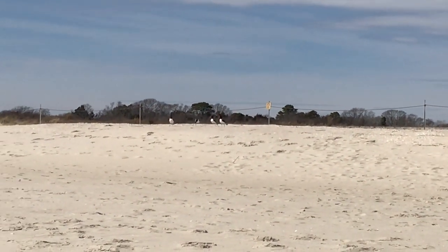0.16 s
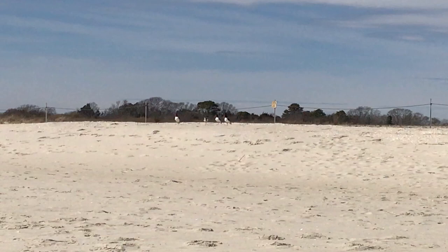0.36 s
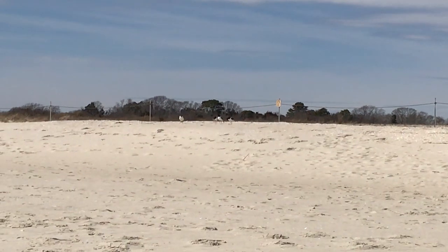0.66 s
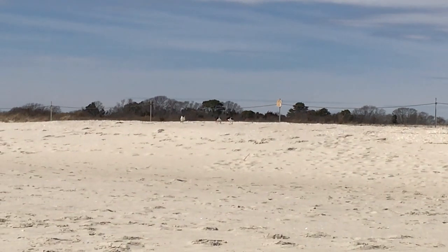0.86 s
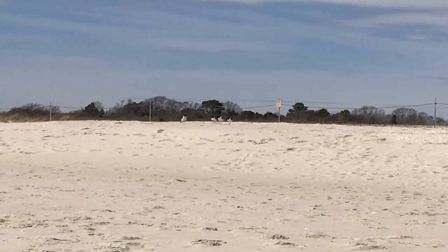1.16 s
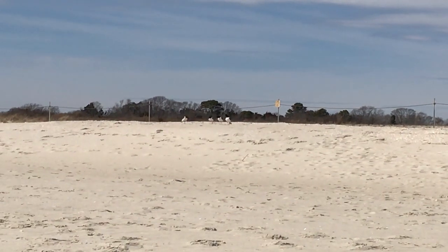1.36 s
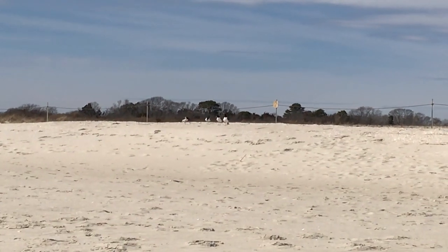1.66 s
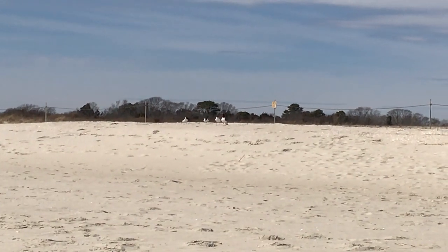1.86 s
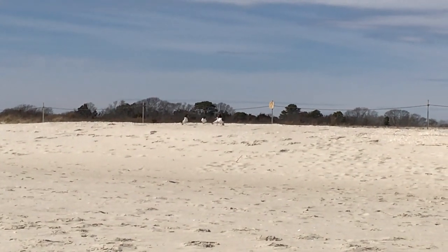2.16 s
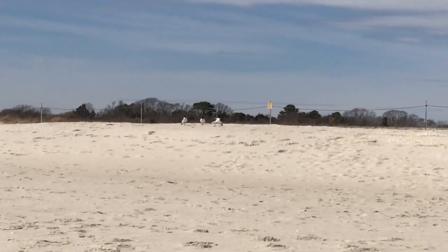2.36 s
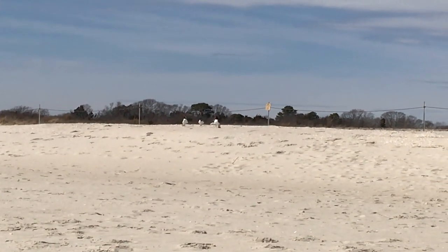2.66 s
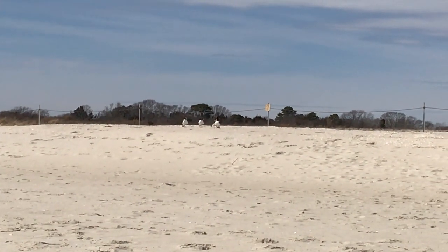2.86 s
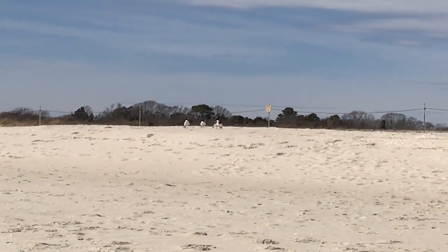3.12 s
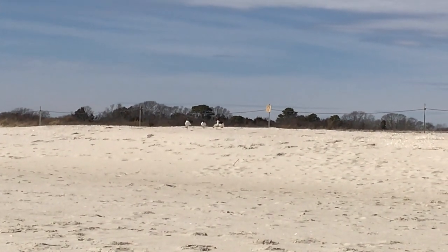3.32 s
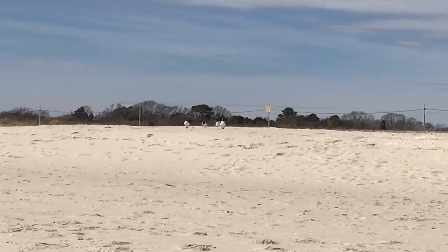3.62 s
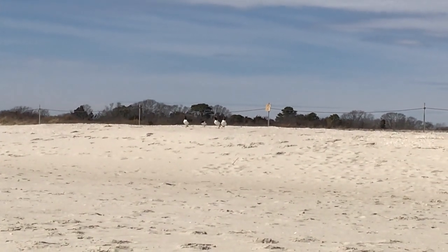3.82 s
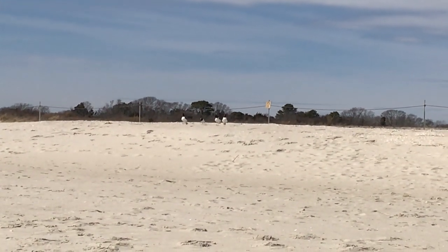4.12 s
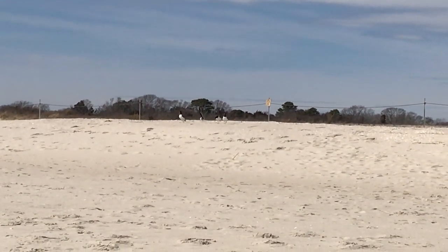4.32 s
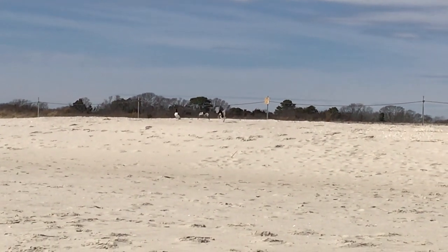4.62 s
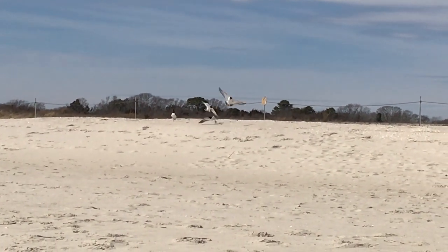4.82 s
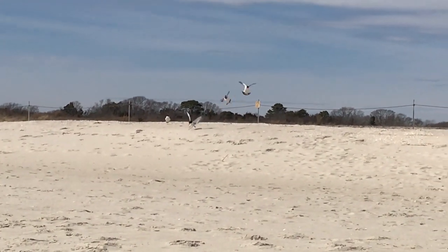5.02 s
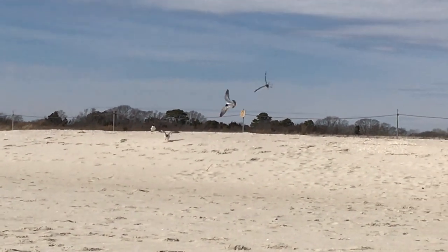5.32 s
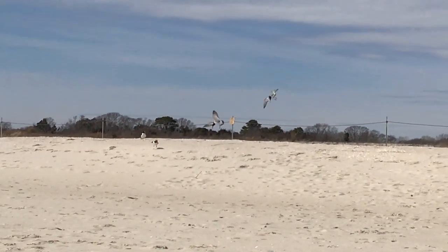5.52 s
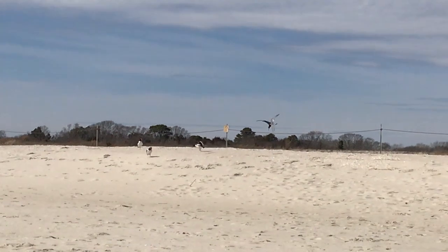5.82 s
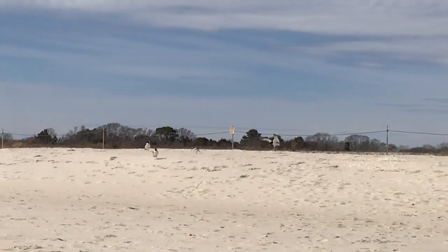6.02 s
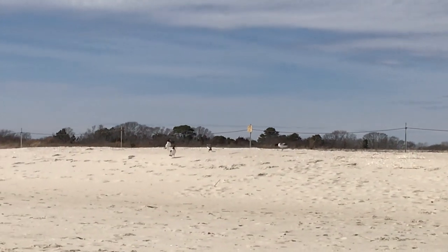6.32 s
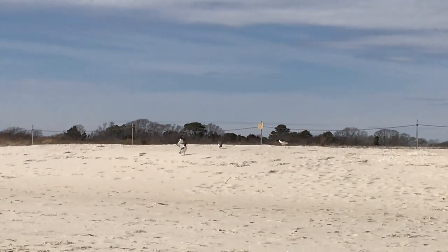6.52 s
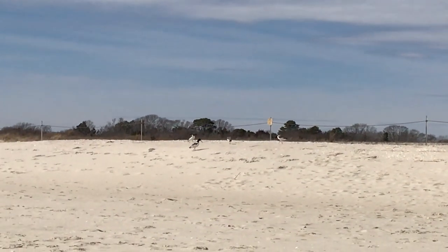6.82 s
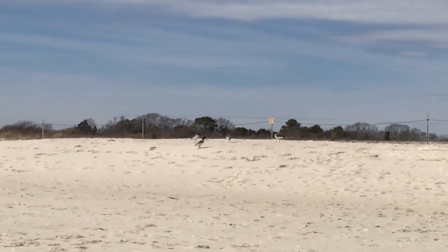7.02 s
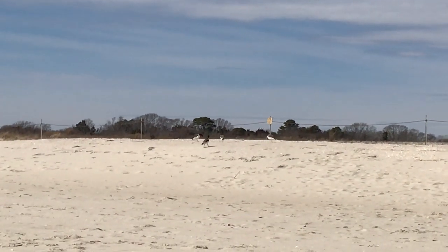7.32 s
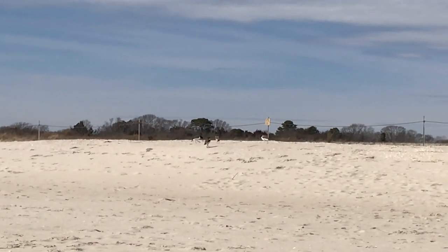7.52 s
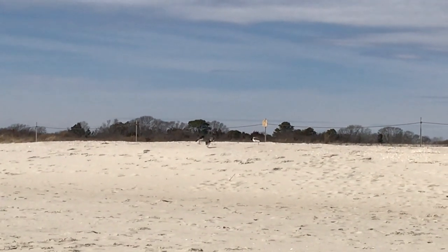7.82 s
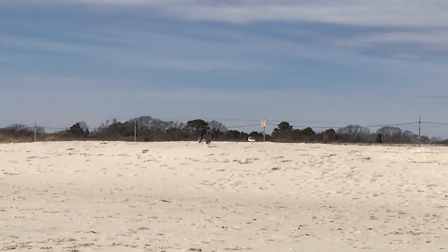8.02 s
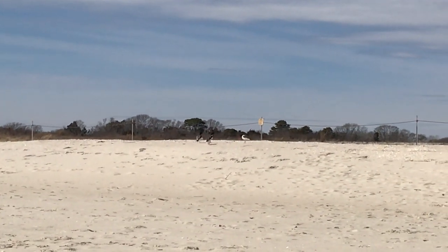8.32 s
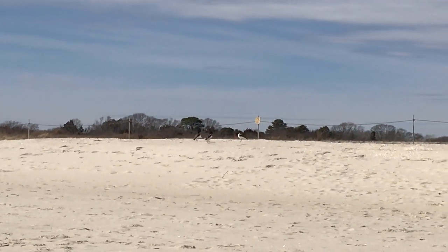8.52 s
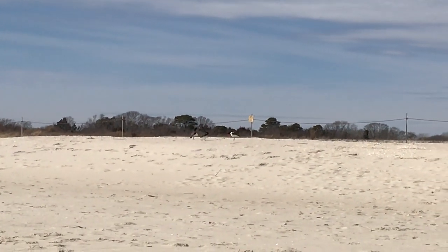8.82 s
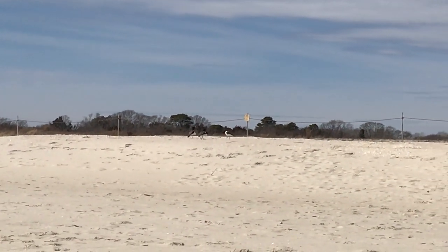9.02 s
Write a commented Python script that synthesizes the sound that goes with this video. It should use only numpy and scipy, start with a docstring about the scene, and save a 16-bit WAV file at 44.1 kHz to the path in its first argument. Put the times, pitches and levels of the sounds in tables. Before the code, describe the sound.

Open beach, mono, dry, about nine seconds. From the start several shorebirds pipe rapid chains of short high whistles, around 2.2 to 2.6 kHz, each arching up and falling, roughly ten a second per bird and overlapping. They grow louder from 0.7 to 2.3 s, then thin out; from 2.7 to 4.8 s there are mostly separate longer whistles. Meanwhile a wave's soft roar swells from 1 s, gains spray hiss, peaks near 4.5 to 4.9 s and drains abruptly by 5.5 s. At 5 s the piping bursts out again, loud and dense until about 6.5 s, then recedes, fainter and duller, with a faint farther flock. Low wind buffets thump the microphone irregularly, strongest near 0.6, 2.8 and 4.9 s, with later knocks near 7.5, 8.4 and 9 s. A faint low wavering hum becomes slightly clearer after the wave.

```python
"""An open sandy beach: several shorebirds pipe fast strings of short arched whistles and some long drawn ones.
The birds are harmonic tones under a pitch arch; a wave of filtered noise swells, hisses and drains away.
A faint hum of slowly frequency-modulated sines lies below, and gusts buffet the microphone as octave bands
of noise whose spectrum shifts towards the smaller eddies as the wind force grows."""
import sys
import numpy as np
from scipy import signal
from scipy.io import wavfile

SR = 44100
rng = np.random.default_rng(int(sys.argv[2]) if len(sys.argv) > 2 else 0)


def log_audio(samples):
    """Write samples as a 16-bit WAV file to the path given in sys.argv[1]."""
    # one column per channel
    frames = np.atleast_2d(samples).T
    # limit to full scale, then quantise
    limited = np.clip(frames, -1, 1)
    pcm = np.round(limited * 32767).astype(np.int16)
    wavfile.write(sys.argv[1], SR, pcm)


N = 404397   # length [samples]


def from_db(db):
    """Level law: amplitude gain is ten to the power of dB over 20."""
    return 10 ** (np.asarray(db) / 20)


def rms_one(x):
    """Normalization: the signal is scaled to unit root mean square."""
    return x / np.sqrt(np.mean(x ** 2) + 1e-20)


def in_time(rows):
    """Linear interpolation: each column of a time table becomes one value a sample."""
    times, *columns = np.transpose(rows)
    return [np.interp(np.arange(N) / SR, times, column) for column in columns]


def drift(rate_hz):
    """Low-passed chance: white noise through two equal one-pole filters, zero mean and unit spread."""
    step, run_in = 20, 4000   # drawn at every 20th sample; the filter's start is dropped
    pole = np.exp(-2 * np.pi * rate_hz * step / SR)
    noise = rng.standard_normal(N // step + run_in + 2)
    slow = signal.lfilter([1], [1, -2 * pole, pole * pole], noise)[run_in:]
    return np.interp(np.arange(N) / step, np.arange(len(slow)), rms_one(slow - slow.mean()))


def band(x, low_hz, high_hz):
    """Band-pass filtering: Butterworth response between two corner frequencies."""
    return signal.sosfilt(signal.butter(2, [low_hz, high_hz], "band", fs=SR, output="sos"), x)


def wash(spectrum, patchy_db):
    """Turbulent noise as a sum of half-octave bands, each with its own level and flicker; unit rms."""
    out = 0
    edges = 110 * 2 ** np.arange(0, 7.6, .5)
    white = rng.standard_normal((2, N))   # neighbouring bands use different noise
    hz, db = np.transpose(spectrum)
    for k, (low, high) in enumerate(zip(edges, edges[1:])):
        log_centre = np.log(low * high) / 2
        level_db = np.interp(log_centre, np.log(hz), db, left=-60, right=-60)
        flicker_db = patchy_db * drift(12.5)
        out = out + from_db(level_db + flicker_db) * band(white[k % 2], low, high)
    return rms_one(out)


# the wave's course, before the fixed gains in surf():
# (time [s], roar level [dB], spray level [dB])
SURF = [(0, -59, -77), (.6, -55.5, -77.5), (1.15, -48.5, -67.5), (2.3, -43, -66), (3.1, -45, -62),
        (4.5, -40, -56), (4.88, -40.5, -53.5), (5.1, -48.5, -59.5), (5.5, -58.5, -69.5), (7.2, -55, -81)]
# relative spectrum of the roar: (frequency [Hz], density [dB per Hz])
ROAR = [(150, -4), (330, -4.5), (600, -6), (950, -4.5), (2300, -13.5), (3000, -19.5), (6500, -41)]
# relative spectrum of the spray: (frequency [Hz], density [dB per Hz])
SPRAY = [(3500, 5.5), (10000, -9), (16000, -25)]


def surf():
    """Broadband radiation of a wave: a low roar and a high spray hiss under separate level curves."""
    roar_db, spray_db = in_time(SURF)
    roar = from_db(roar_db + 3.0) * wash(ROAR, patchy_db=1.02)
    spray = from_db(spray_db + 5.0) * wash(SPRAY, patchy_db=2.0)
    return roar + spray


# partials of the hum at its full strength: (mean frequency [Hz], peak level [dB])
HUM = [(76, -44), (155, -56.5), (232, -57.5), (460, -64)]


def hum():
    """Frequency modulation: faint low sines waver in pitch and come up as the wave drains."""
    t = np.arange(N) / SR
    tones = 0
    for hz, db in HUM:
        time_shift = 0.01603 * np.cumsum(drift(2.35)) / SR   # pitch spread 1.6 %
        tones = tones + from_db(db) * np.sin(2 * np.pi * hz * (t + time_shift))
    return tones * from_db(np.interp(t, [4.5, 5.4], [-12, 0]))


# steady wind between the buffets, before its random swing: (time [s], force level [dB])
BREEZE = [(0, -49), (1.3, -41.5), (1.85, -57), (2.15, -37), (3.5, -41.5), (5.3, -38.5), (6, -44.5),
          (9.17, -43.5)]
# buffets on the microphone: (centre time [s], standard deviation [s], peak force level [dB])
GUSTS = [(0.223, 0.045, -38), (0.569, 0.0031, -19.5), (0.59, 0.032, -29), (1.23, 0.0073, -26),
         (2.17, 0.037, -52), (2.315, 0.14, -40.5), (2.754, 0.0037, -12.5), (2.794, 0.041, -23),
         (3.032, 0.039, -30), (3.635, 0.012, -28), (4.122, 0.0049, -26.5), (4.265, 0.046, -32),
         (4.512, 0.0078, -23), (4.86, 0.01, -27), (4.943, 0.017, -13.5), (5.039, 0.0034, -28.5),
         (5.193, 0.047, -36), (5.379, 0.017, -25.5), (5.507, 0.029, -27.5), (6.501, 0.014, -26),
         (7.211, 0.014, -32.5), (7.466, 0.0087, -22), (8.416, 0.01, -19), (8.964, 0.015, -33.5),
         (9.036, 0.016, -24.5)]
# eddy sizes in a strong gust, one entry an octave from 36 Hz up: (level [dB])
EDDY_DB = [-2.5, -3.2, -8.5, -18.5, -43]


def wind():
    """Turbulent pressure at the microphone: the harder the gust, the more small sharp eddies ride on it."""
    t = np.arange(N) / SR
    force = from_db(in_time(BREEZE)[0] + 3.87 * drift(2.74))
    reach_s = .25   # each bell-shaped gust is cut off this far from its centre
    for s, width_s, db in GUSTS:
        near = slice(max(round((s - reach_s) * SR), 0), round((s + reach_s) * SR))
        force[near] += from_db(db) * np.exp(-.5 * ((t[near] - s) / width_s) ** 2)
    out, lumps = 0, drift(30.4)   # all octaves share the same lumps of pressure
    for octave, db in enumerate(EDDY_DB):
        low_hz = 36 * 2 ** octave
        noise = band(rng.standard_normal(N), low_hz, 2 * low_hz)
        eddy = rms_one(noise * from_db(4.74 * lumps))
        growth = (force / from_db(-20.5)) ** (0.2 * (octave - 1))   # 1 for every octave at -20.5 dB
        out = out + eddy * force * growth * from_db(db)
    return out


# harmonics 3-6 of a note, before its own brightness and colour: (level [dB])
OVERTONES_DB = [-5, -16.5, -24, -37]
DROOP_PER_S = 0.398   # share of its top pitch that a note loses per second past its crest, besides its fall


def whistle(length_s, crest, top_hz, rise, fall, bright_db, boost_db, shrill_db, chance, edge_s=0.0053):
    """Harmonic synthesis: integrated frequency gives the phase of a tone whose pitch arches up and down."""
    t = np.arange(round(length_s * SR)) / SR
    v = t / length_s
    flatness = 2.1 + 7 * length_s   # longer notes hold their top pitch
    climb = rise * np.abs(1 - v / crest) ** flatness
    descent = fall * np.abs((v - crest) / (1 - crest)) ** (flatness + 16 * length_s)
    droop = DROOP_PER_S * (t - crest * length_s)
    sag = np.where(v < crest, climb, descent + droop)   # share below the top pitch
    phase = 2 * np.pi * np.cumsum(top_hz * (1 - sag)) / SR
    tone = from_db(-25 * sag) * np.sin(phase)   # the fundamental is weaker where the pitch is low
    swing_db = 7 * (v - .5)   # the bill moves, so each harmonic swells or fades through the note
    scatter_db = 2.5 * chance[1]   # no two notes have the same colour
    tone += from_db(bright_db + swing_db * chance[0, -1]) * np.sin(2 * phase)
    # higher harmonics follow the brightness in part; long whistles are purer
    common_db = 0.76 * bright_db + boost_db - 5 * sag - 60 * length_s
    for k, db in enumerate(OVERTONES_DB):
        colour_db = shrill_db * k + scatter_db[k] + swing_db * chance[0, k]
        tone += from_db(common_db + db + colour_db) * np.sin((k + 3) * phase)
    edges = np.clip(np.minimum(t / edge_s, (length_s - t) / (2.48 * edge_s)), 0, 1)
    return np.sqrt(2) * np.sin(edges * np.pi / 2) ** 2 * tone


# short pips of three birds: (start time [s], bird [letter], top pitch [Hz], level [dB])
PIPS = [(.072, "B", 2545, -46), (.142, "A", 2310, -53), (.18, "C", 2470, -64), (.225, "A", 2244, -52),
        (.242, "B", 2560, -45), (.31, "A", 2235, -48.5), (.376, "C", 2480, -58), (.402, "A", 2240, -48.5),
        (.451, "B", 2540, -46), (.498, "A", 2220, -47), (.54, "A", 2080, -53), (.583, "A", 2244, -46),
        (.667, "C", 2480, -58), (.687, "A", 2246, -43.5), (.772, "C", 2510, -55), (.784, "A", 2290, -42.5),
        (.874, "C", 2480, -50.5), (.898, "A", 2264, -41.5), (.972, "C", 2480, -51),
        (.974, "B", 2625, -47.5), (1.016, "A", 2195, -39.5), (1.082, "B", 2520, -47.5),
        (1.125, "A", 2210, -40.5), (1.199, "C", 2500, -45), (1.222, "A", 2180, -42),
        (1.301, "C", 2500, -48), (1.308, "B", 2643, -44), (1.319, "A", 2200, -41), (1.42, "C", 2440, -47.5),
        (1.423, "A", 2220, -46), (1.529, "C", 2400, -47), (1.652, "C", 2480, -44.5),
        (1.666, "B", 2580, -38.5), (1.758, "B", 2460, -39), (1.817, "A", 2250, -46.5),
        (1.892, "C", 2440, -45.5), (2.012, "C", 2420, -43), (2.099, "B", 2450, -36.5),
        (2.152, "C", 2365, -44), (2.19, "B", 2416, -39), (2.286, "A", 2282, -40), (2.292, "B", 2340, -44),
        (2.416, "B", 2406, -45), (2.514, "C", 2460, -45), (2.547, "A", 2184, -41.5),
        (2.613, "B", 2326, -47), (2.968, "C", 2310, -48.5), (3.687, "A", 2090, -47.5),
        (4.365, "A", 2250, -49.5), (4.994, "A", 2510, -41.5), (5.083, "A", 2350, -41.5),
        (5.175, "A", 2280, -40), (5.253, "A", 2460, -37), (5.346, "A", 2370, -36), (5.357, "B", 2590, -46),
        (5.441, "A", 2256, -38), (5.467, "B", 2550, -44.5), (5.54, "A", 2375, -39),
        (5.573, "B", 2500, -42.5), (5.644, "A", 2330, -37.5), (5.673, "B", 2445, -40.5),
        (5.754, "A", 2340, -37.5), (5.755, "B", 2476, -37.5), (5.854, "B", 2460, -39),
        (5.867, "A", 2360, -38.5), (5.944, "B", 2430, -40), (5.995, "A", 2395, -40),
        (6.039, "B", 2410, -39), (6.099, "A", 2406, -38.5), (6.133, "B", 2434, -39),
        (6.232, "B", 2447, -41), (6.333, "B", 2410, -39.5), (6.45, "B", 2455, -40.5),
        (6.552, "C", 2520, -51), (6.586, "B", 2440, -39), (6.694, "C", 2490, -49),
        (6.745, "B", 2435, -41.5), (6.807, "C", 2480, -53), (6.923, "B", 2404, -42.5),
        (7.038, "C", 2440, -48), (7.11, "B", 2400, -44), (7.156, "C", 2460, -46), (7.207, "B", 2350, -46),
        (7.266, "C", 2490, -48.5), (7.27, "A", 2300, -50.5), (7.396, "A", 2270, -43.5),
        (7.507, "A", 2240, -46.5), (7.541, "B", 2380, -51.5), (7.59, "A", 2340, -48),
        (7.658, "C", 2470, -52), (7.749, "C", 2430, -55.5), (7.783, "A", 2290, -56),
        (7.808, "C", 2460, -57), (7.892, "A", 2234, -59), (7.894, "C", 2420, -53),
        (7.932, "B", 2260, -47.5), (7.997, "A", 2270, -55), (8.025, "B", 2380, -52),
        (8.1, "A", 2234, -54.5), (8.137, "B", 2430, -49), (8.218, "A", 2190, -50), (8.248, "C", 2450, -56),
        (8.292, "C", 2355, -58), (8.311, "A", 2180, -51.5), (8.318, "B", 2410, -56),
        (8.388, "C", 2450, -60), (8.42, "A", 2220, -51.5), (8.452, "C", 2440, -55), (8.5, "B", 2370, -57),
        (8.523, "A", 2230, -54), (8.6, "C", 2460, -51.5), (8.626, "B", 2370, -54), (8.657, "A", 2170, -56),
        (8.708, "B", 2420, -56), (8.77, "A", 2090, -60), (8.865, "C", 2420, -55.5),
        (8.922, "A", 2100, -55.5), (8.943, "C", 2430, -56), (8.983, "B", 2420, -61),
        (9.026, "A", 2070, -54), (9.043, "C", 2390, -53.5), (9.124, "C", 2450, -55),
        (9.132, "A", 2084, -54), (9.14, "B", 2350, -51)]
# pitch arch of every pip: (crest [0-1 of the length], rise [share of top pitch], fall [share of top pitch])
PIP_SHAPE = (0.473, 0.2055, 0.263)
# how each bird pips as it turns and tires, by bird:
# (time [s], pip length [s], brightness: 2nd harmonic before its swing [dB])
VOICES = { "A": [(.14, 0.035, -6), (.3, 0.038, -13.5), (.6, 0.05, -15), (.85, 0.043, -9.5),
          (1.2, 0.028, -20.5), (1.43, 0.061, -8.5), (1.8, 0.061, -5), (2.55, 0.047, -12),
          (3.7, 0.038, -0.5), (5.1, 0.03, -2.5), (5.6, 0.034, -8.5), (5.75, 0.0292, -1.5), (6.1, 0.047, -1),
          (7.27, .07, -9.5), (7.4, 0.043, -16.5), (8.05, 0.038, -7.5), (8.3, 0.045, -18.5),
          (9.1, 0.043, -10)], "B": [(.07, 0.084, -12), (.24, .11, -30), (.45, 0.068, -22),
          (1.05, 0.086, -17.5), (1.3, 0.073, -24), (1.75, 0.064, -7), (2.1, 0.059, -16.5),
          (2.4, 0.054, -18), (2.6, 0.087, -11), (5.35, 0.065, -21), (5.65, 0.0535, -13), (6.05, 0.046, -13),
          (6.23, 0.053, -2.5), (6.45, 0.061, -17), (6.75, 0.08, -13), (7.15, 0.055, -23.5),
          (9, 0.056, -17)], "C": [(.3, 0.046, -11), (.75, 0.034, -3), (1.2, 0.035, -23), (1.32, 0.044, -5),
          (1.5, 0.042, -3.5), (2, 0.052, -10), (2.5, 0.045, -16), (6.65, 0.054, -25), (7.05, 0.04, -13.5),
          (7.27, 0.042, -24), (7.7, 0.037, -18), (8.25, 0.039, -7), (8.45, 0.0355, -20), (9.1, 0.038, -13)]}
# how shrill each bird's pips are, by bird: (time [s], tilt [dB per harmonic above the 3rd])
SHRILL = {"A": [(2.6, 1), (5, -3.5)], "B": [(5.9, -0.5), (6.2, 5), (6.7, -1.2)], "C": [(5, -1.5)]}
# the birds move off and harmonics 3-6 of their pips fade: (time [s], level [dB])
DULLING = [(7.2, 0), (7.9, -10)]
# long whistles: (start time [s], length [s], crest [0-1 of the length], top pitch [Hz],
# fall [share of top pitch], level [dB], brightness: 2nd harmonic before its swing [dB],
# boost of harmonics 3-6 [dB], shrillness [dB per harmonic above the 3rd])
WHISTLES = [(0.491, 0.051, 0.15, 3054, 0.11, -47.5, -15, 0, 3),
            (0.682, 0.21, 0.25, 2546, 0.18, -52.5, -17, 7, 4),
            (1.405, 0.097, 0.23, 2550, 0.31, -46, -14.5, 1, -2),
            (2.691, 0.14, 0.3, 2450, 0.15, -43.5, -13, 4.5, 5),
            (3.181, .15, 0.4, 2480, 0.15, -49.5, -24, -3, -4),
            (3.547, 0.14, 0.28, 2480, 0.14, -41.5, -9, -5, -5),
            (3.808, 0.13, .66, 2326, 0.05, -49, -2, 1, -6),
            (3.872, 0.14, 0.3, 2335, 0.17, -46.5, 2.5, -5, 11),
            (4.01, 0.142, 0.3, 2510, 0.13, -46, -3, 3, -8), (4.699, 0.122, .2, 2280, .05, -49, 3, -12, -3),
            (4.92, .07, .45, 2340, .2, -51, -3, -8, -3), (5.104, .14, 0.37, 2670, 0.115, -46, -8.5, 8, 1),
            (6.24, 0.21, 0.7, 2330, 0.4, -51, -2.5, 1, -6),
            (6.836, 0.18, 0.81, 2446, 0.15, -46.5, -17.5, -6, -3),
            (7.327, 0.12, 0.5, 2450, 0.15, -48.5, -19, -1, -2),
            (7.683, 0.079, 0.37, 2415, 0.19, -48, -17, 5, -4)]
RISE_SHARE, RISE_PER_S = .13, 0.97   # a whistle climbs more the later its crest [share, share per s]


def all_notes():
    """Note parameters by interpolation: start, length, crest, pitch, rise, fall, level and three of colour."""
    crest, rise, fall = PIP_SHAPE
    notes = [(s, n, c, hz, RISE_SHARE + RISE_PER_S * c * n, *rest)
             for s, n, c, hz, *rest in WHISTLES]
    for s, bird, hz, db in PIPS:
        times, lengths, brights = np.transpose(VOICES[bird])
        length_s = np.interp(s, times, lengths)
        bright_db = np.interp(s, times, brights)
        boost_db = np.interp(s, *np.transpose(DULLING))
        shrill_db = np.interp(s, *np.transpose(SHRILL[bird]))
        notes.append((s, length_s, crest, hz, rise, fall, db, bright_db, boost_db, shrill_db))
    return notes


def birds():
    """Superposition and amplitude modulation: all notes add up, and the moving air makes them waver."""
    crest, rise, fall = PIP_SHAPE
    notes = all_notes()
    far = rng.standard_normal((36, 2))   # a farther flock pips faintly at chance moments
    starts = rng.uniform(0, N / SR, len(far))
    notes += [(s, .038, crest, 2330 + 140 * a, rise, fall, -58 + 2 * b, -17, -6, 0)
              for s, (a, b) in zip(starts, far)]
    out = np.zeros(N + SR)   # room for notes that ring past the end
    chance = rng.standard_normal((len(notes), 2, 5))
    for (s, *shape, db, bright_db, boost_db, shrill_db), luck in zip(notes, chance):
        note = from_db(db) * whistle(*shape, bright_db, boost_db, shrill_db, luck)
        at = round(s * SR)
        out[at:at + len(note)] += note
    out = out[:N]
    waver_db = 2.1 - 0.085 * in_time(DULLING)[0]   # more so the farther the birds
    overtones = band(out, 2950, 21000)
    low_part = (out - overtones) * from_db(waver_db * drift(31))
    return low_part + overtones * from_db(1.3 * waver_db * drift(48))


def scene():
    """Linear superposition: the pressures of surf, hum, wind and birds add in one channel."""
    return (surf() + hum() + wind() + birds())[None]


def record(dry):
    """Transducer limits: deep bass is cut, faint hiss added, hard peaks rounded and the top cut steeply."""
    hiss = from_db(-72.5) * rng.standard_normal(N)
    thin = signal.sosfilt(signal.butter(3, 38, "high", fs=SR, output="sos"), dry + hiss)
    rounded = .55 * np.tanh(thin / .55)
    return signal.sosfilt(signal.ellip(12, .5, 80, 15740, fs=SR, output="sos"), rounded)


dry = scene()
out = record(dry)
log_audio(out)
```